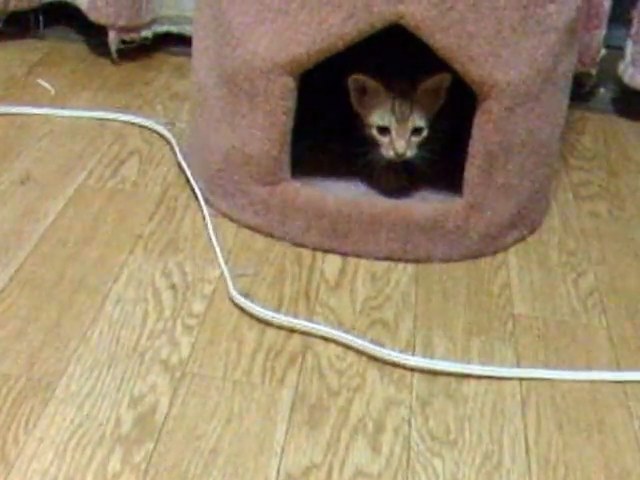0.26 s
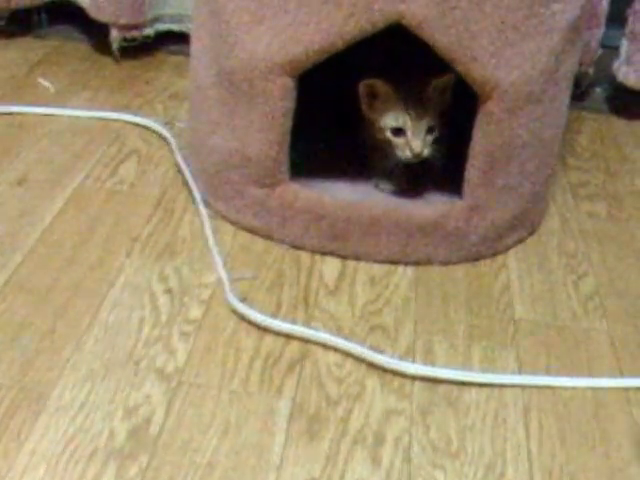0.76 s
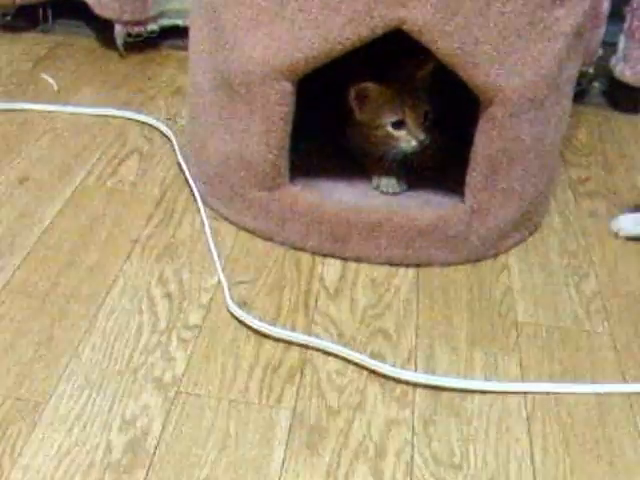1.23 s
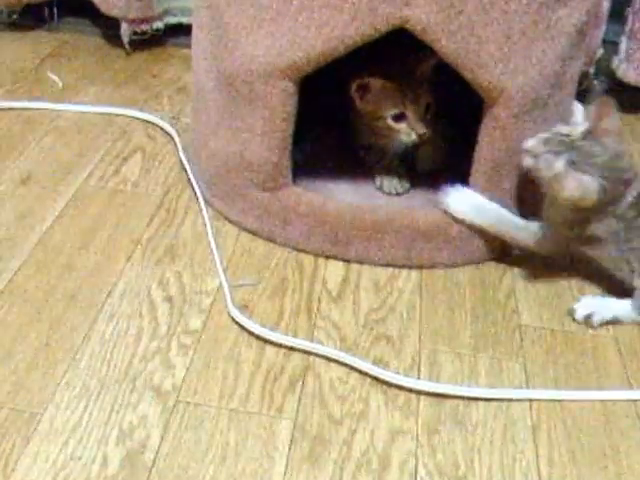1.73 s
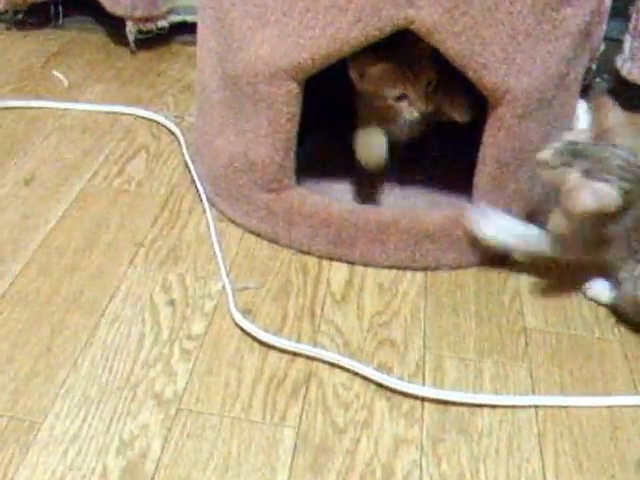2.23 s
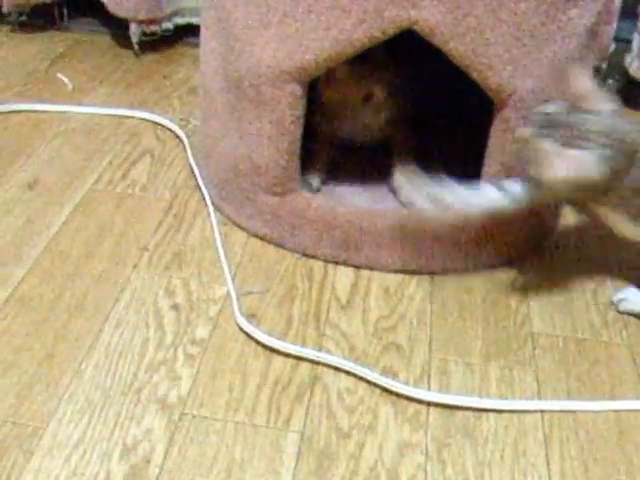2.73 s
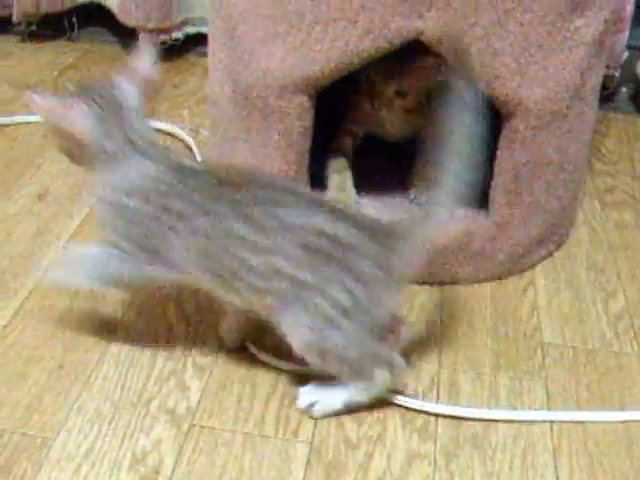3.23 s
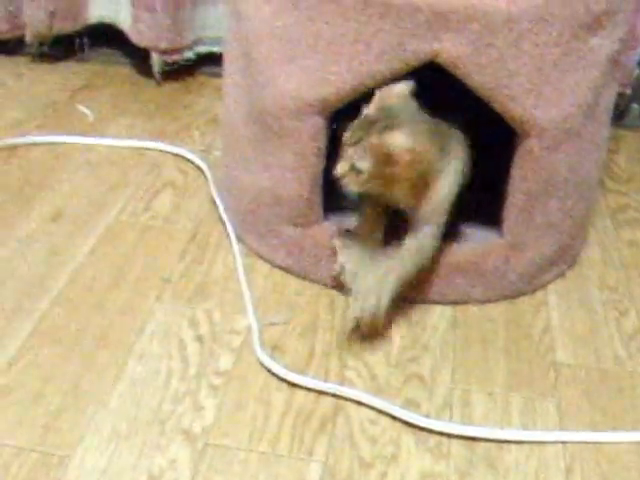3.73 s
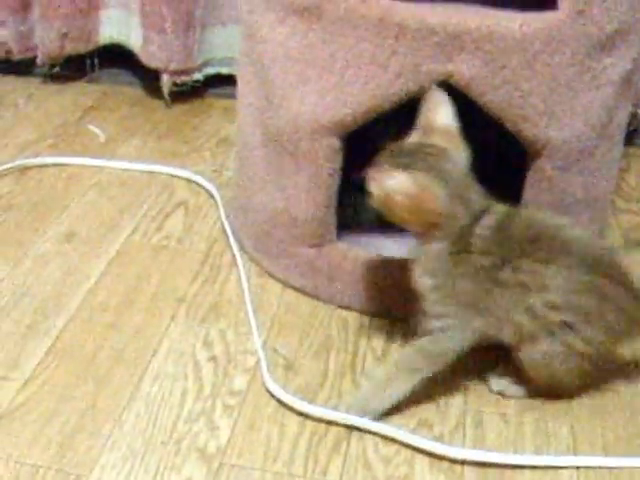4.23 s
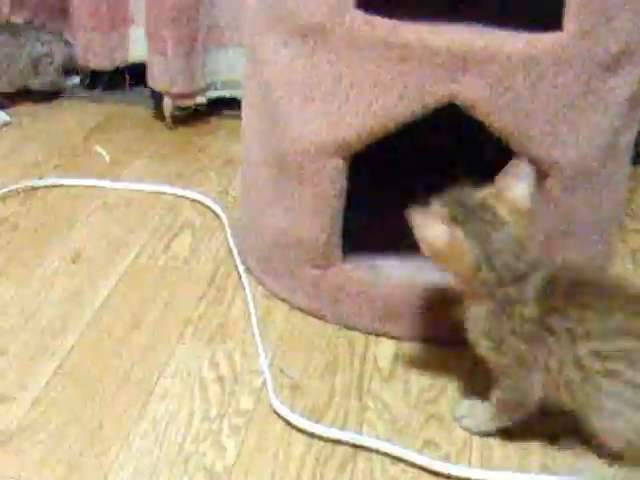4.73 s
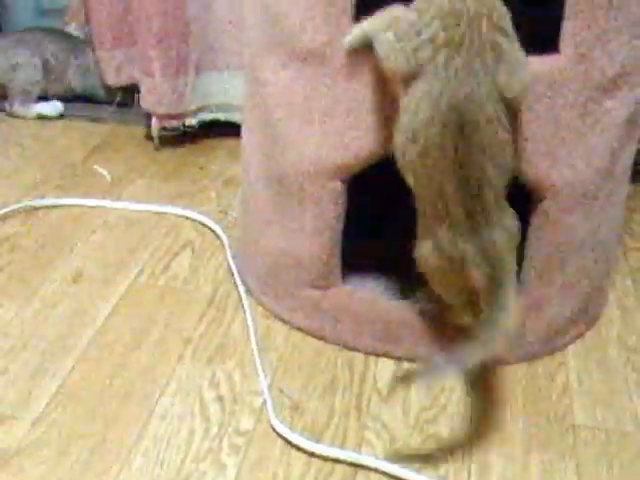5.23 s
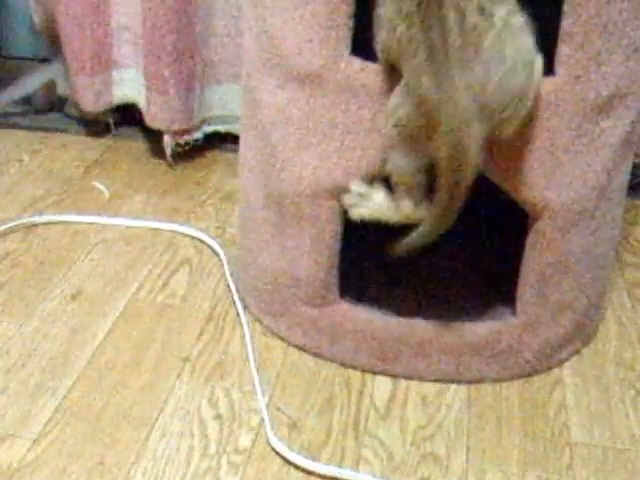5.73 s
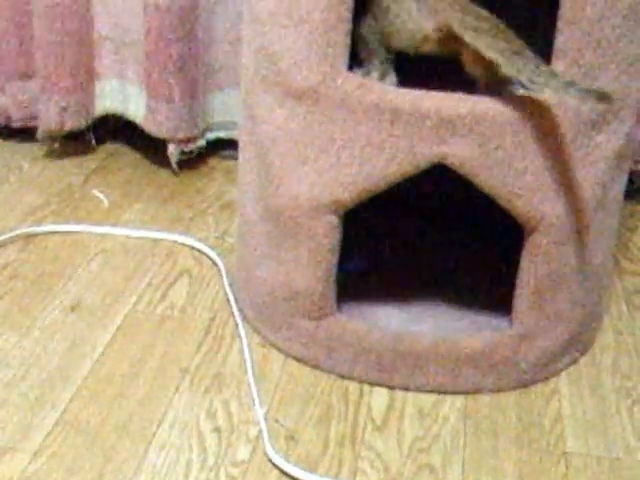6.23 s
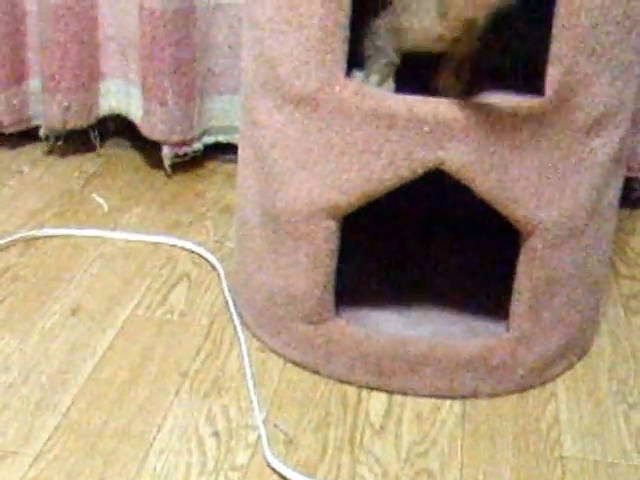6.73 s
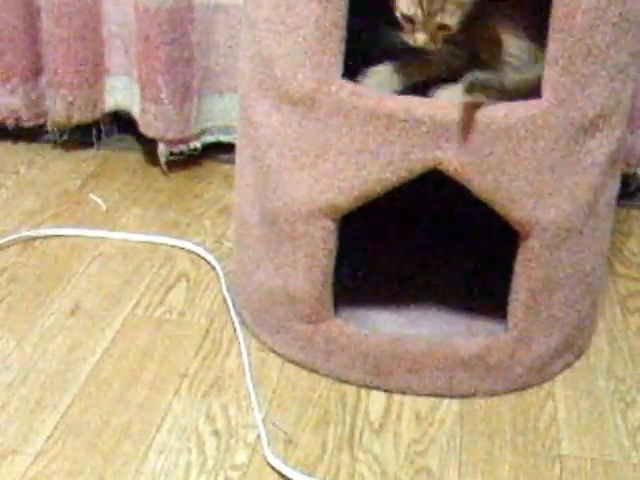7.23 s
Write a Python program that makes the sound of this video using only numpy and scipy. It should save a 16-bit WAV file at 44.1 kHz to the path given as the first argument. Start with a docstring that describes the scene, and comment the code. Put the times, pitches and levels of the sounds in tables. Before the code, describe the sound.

Two kittens romp around a carpeted cat tower on a wooden floor. Claw ticks and quick paw knocks come first, then scattered pats and scuffs, a burst of running steps near three seconds, and scratchy climbing. The last two seconds hold little but a sputtering hiss. Close, small, coarse camera microphone in a small room.

```python
"""Kittens on a cat tower

Two kittens romp round a carpeted cat tower on a wooden floor, close to a small camera.
Pads excite decaying board modes; paws slap as filtered noise bursts; claws tick as short damped tones
and scrape through carpet as grainy noise. Fur brushes past, and a small room answers each contact.
The camera's coarse 8-bit converter turns the faint room noise into a sputtering hiss."""
import sys
import numpy as np
from scipy import signal
from scipy.fft import rfft, irfft, next_fast_len
from scipy.io import wavfile

SR = 44100
rng = np.random.default_rng(int(sys.argv[2]) if len(sys.argv) > 2 else 0)


def put_to_file(sound):
    """Save the sound as 16-bit audio at rate SR, in the file named by the first command-line argument."""
    columns = np.atleast_2d(sound).T  # one column per channel
    safe = np.clip(columns, -1, 1)
    whole_steps = np.round(safe * 32767)
    wavfile.write(sys.argv[1], SR, whole_steps.astype(np.int16))


N = 329292
T = np.arange(SR // 2) / SR  # seconds since a contact

# Paws landing on wood. Each row: start in seconds, snap level in dB before the gain of the taps,
# knock near 500 Hz and clack near 1700 Hz in dB relative to the snap,
# pad thump level in dB, thump pitch in Hz, level of the body's weight in dB.
PAW_LANDINGS = [(.759, -32.5, 3.5, 2, -16.5, 220.2, -35.5), (.849, -34.5, 3.5, -4.5, -19, 148.2, -27),
                (.993, -28.5, -1, -7, -24, 237.5, -33), (1.0269, -23, 3.5, 3.5, -31.5, 238, -27),
                (1.177, -35, 9.5, -2, -35, 98.2, -31.5), (1.405, -40.5, 2, -12.5, -32, 129.7, -47.5),
                (1.496, -38, 11, -1, -32.5, 217.4, -43.5), (1.656, -42.5, 7, -9, -23.5, 234.5, -34),
                (2.2582, -34, 1, 4.5, -27, 353, -47), (2.38, -45, 2.5, 1.5, -30.5, 63.7, -42),
                (2.971, -38, 10, 1.5, -31, 148.2, -44), (3.112, -28, 9, 4, -28.5, 298, -44.5),
                (3.139, -38, 12.5, -5.5, -29.5, 168.3, -28.5), (3.2071, -30.5, 9.5, -3, -25.5, 169, -16.5),
                (3.648, -42, 10, -2, -30, 79, -38.5), (3.868, -38.5, 9, -4, -27, 142.2, -36),
                (3.9369, -35.5, 3, -2.5, -28.5, 84.4, -34.5), (4.054, -41.5, 2, -5.5, -33.5, 67.1, -46),
                (4.186, -37, 6, -2.5, -31.5, 260.4, -37), (4.322, -38.5, 7.5, -3.5, -30.5, 111.3, -43),
                (4.5447, -36, -9.5, -13, -40, 127.6, -50.5), (4.815, -37, -10, 3.5, -46.5, 129.5, -51.5),
                (4.874, -37, -15, -7, -32.5, 109.7, -40.5), (5.227, -47.5, 9, 5.5, -49.5, 198, -49)]
# Claws skidding or dragged through carpet. Each row: start in seconds, level in dB before the gain
# of the scuffs, rise in seconds, t60 in seconds, body near 800 Hz in dB relative to the rasp.
CLAW_SCUFFS = [(0.432, -43, .005, .055, -3.5), (.926, -33.5, 0.011, .16, -9.5),
               (1.595, -28, .008, .08, -10), (1.862, -40.5, 0.0083, .25, -16.5),
               (2.349, -46, 0.0048, .15, 10), (2.77, -42, .014, .2, -2), (2.825, -39.5, 0.0022, .15, 5.5),
               (2.866, -41, .012, .13, -3), (3.334, -33.5, .05, 0.079, -1.5),
               (3.396, -36.5, .018, .22, -21.5), (3.514, -36, 0.0054, .1, -10),
               (3.624, -40, 0.0055, .26, -4), (3.952, -21.5, 0.0014, .07, -10),
               (4.428, -41, 0.021, .21, -7.5), (4.548, -35.5, .007, .11, -4), (4.81, -39.5, .004, .22, -12)]
# Treble response of claw and paw contacts. Each row: frequency in Hz, gain in dB.
CLAW_TREBLE = [(3000, -1), (4700, 0), (6500, -4), (8000, -9), (10000, -23.5)]

SETTLE_S = .014  # the body's weight follows the paw by this delay


def amp(db):
    """Level: decibels to an amplitude ratio."""
    return 10 ** (np.asarray(db) / 20)


def unit(x):
    """Power normalization: x at rms 1."""
    return x / np.sqrt(np.mean(x ** 2))


def unit_energy(x):
    """Energy normalization: squared samples sum to 1."""
    return x / np.linalg.norm(x)


def fade(t60):
    """Exponential damping: a decay of 60 dB in t60 seconds."""
    return np.exp(-np.log(1000) * T / t60)


def onset(time_s):
    """Exponential approach: a rise from 0 towards 1 with this time constant."""
    return 1 - np.exp(-T / time_s)


def along(points, hz):
    """Logarithmic frequency axis: values interpolated between (Hz, value) points."""
    f, v = np.transpose(points)
    return np.interp(np.log(hz + 1), np.log(f), v)


def colour(x, points):
    """Minimum-phase filtering: the (Hz, dB) gain is made causal by folding its cepstrum."""
    m = 2 * next_fast_len(len(x))
    gain_db = along(points, np.fft.rfftfreq(m, 1 / SR))
    cepstrum = irfft(np.log(amp(gain_db)), m)
    cepstrum[1:m // 2] *= 2
    cepstrum[m // 2 + 1:] = 0
    response = np.exp(rfft(cepstrum))
    return irfft(rfft(x, m) * response, m)[:len(x)]


def crackle(spread_db, grain_s=.0003):
    """Granular noise: short grains whose levels scatter by spread_db."""
    grain = (T / grain_s).astype(int)
    sizes = amp(spread_db * np.clip(rng.standard_normal(len(T)), -2, 2))
    return unit(rng.standard_normal(len(T)) * sizes[grain])


def in_room(x, walls_db, tail_db, count=7):
    """Room response: direct sound, early reflections and a diffuse tail, drawn anew for each contact."""
    # Reverberation of the room. Each row: frequency in Hz, t60 in seconds.
    reverb_times = [(100, 0.6), (500, 0.22), (2000, 0.19), (8000, .22)]
    hz, t, z = signal.stft(rng.standard_normal(len(T)), SR, nperseg=256)
    decay = np.exp(-np.log(1000) * t / along(reverb_times, hz)[:, None])
    tail = signal.istft(z * decay, SR, nperseg=256)[1][:len(T)]
    delays = (rng.uniform(.002, .016, count) * SR).astype(int)
    walls = np.bincount(delays, rng.standard_normal(count), len(T))
    answer = amp(walls_db) * unit_energy(walls)
    answer += amp(tail_db) * unit_energy(tail * onset(.013))
    return x + signal.fftconvolve(x, answer)[:len(T)]


def add(track, s, sound):
    """Superposition: mix a sound into the track at s seconds."""
    part = track[round(s * SR):][:len(sound)]
    part += sound[:len(part)]


def background(level_db=-52):
    """Stationary noise: room rumble and microphone noise, its rms below one converter step."""
    # Spectrum of the noise. Each row: frequency in Hz, relative density in dB per Hz.
    spectrum = [(5, -13), (25, -6.5), (45, -2), (75, -3), (120, -11.5), (170, -10), (300, -16.5),
                (900, -19), (2500, -22), (7500, -25)]
    return amp(level_db) * unit(colour(rng.standard_normal(N), spectrum))


def rubs():
    """Friction noise through a resonance: fur brushes the hollow tower in faint swells."""
    # Each row: middle in seconds, level in dB, length in seconds, pitch in Hz.
    fur_strokes = [(0.445, -53.5, 0.056, 1250), (2.808, -55, .04, 474), (5.788, -61, 0.056, 947)]
    out = np.zeros(N)
    time = np.arange(N) / SR
    for s, db, length, hz in fur_strokes:
        resonance = [(hz / 2, -22), (hz, 0), (hz * 2, -16), (hz * 8, -32)]
        hollow = unit(colour(rng.standard_normal(N), resonance))
        swell = np.exp(-((time - s) / length) ** 2)
        out += amp(db) * hollow * swell
    return out


def shuffle_strokes(count=8, gap_s=.045, scatter_db=3, rise_s=.008, t60_s=.14):
    """Irregular repetition: faint scuffs while a kitten shifts its feet; rows like CLAW_SCUFFS."""
    # Each row: start in seconds, end in seconds, level in dB before the gain of the scuffs,
    # body in dB relative to the rasp.
    foot_shifts = [(1.829, 2.05, -46, -12), (2.668, 2.76, -47, -1), (3.969, 4.04, -42, 5.5),
                   (4.618, 4.693, -47, -12), (4.857, 4.91, -44.5, -14.5), (5.033, 5.3, -47.5, -1.5)]
    rows = []
    for start, end, db, body_db in foot_shifts:
        times = start + gap_s * (np.arange(count) + rng.random(count) / 2)
        levels = db + scatter_db * rng.standard_normal(count)
        rows += [(s, level, rise_s, t60_s, body_db) for s, level in zip(times, levels) if s < end]
    return rows


def scuffs(clump_db=3.5, clump_s=.0015, gain_db=7):
    """Stick-slip friction: claws catch and slip in uneven tiny scrapes that swell and die."""
    out = np.zeros(N)
    for s, db, rise, t60, body_db in CLAW_SCUFFS + shuffle_strokes():
        swell = np.minimum(T / rise, 1) ** 1.3
        decay = np.exp(-np.log(1000) * np.maximum(T - rise, 0) / t60)
        body = [(150, body_db - 5.5), (750, body_db), (1700, body_db / 2 - 5.5)]
        rasp = colour(crackle(clump_db, clump_s) * swell * decay, body + CLAW_TREBLE)
        add(out, s, in_room(amp(db + gain_db) * rasp, walls_db=-15, tail_db=-9.0))
    return out


def snags(count=3, level_db=.5, scatter_db=3, median_hz=4376, log_spread=.15, reach=.25):
    """Random catching: claw tips snag just after a scuff's crest; rows of (s, peak dB, pitch Hz)."""
    rows = []
    for s, db, rise, t60, _ in CLAW_SCUFFS:
        for _ in range(count):
            moment = s + rise + reach * t60 * rng.random() ** 2  # reach is a share of t60
            peak_db = db + level_db + scatter_db * rng.standard_normal()
            hz = median_hz * np.exp(log_spread * rng.standard_normal())
            rows.append((moment, peak_db, hz))
    return rows


def ticks(t60=.007, roughness=.7):
    """Damped resonance: a claw tip snaps free and rings for a few milliseconds."""
    # Loud single claw tips. Each row: start in seconds, direct peak in dB, pitch in Hz.
    claw_tips = [(.638, -32, 4210), (.643, -23.5, 4276), (.7405, -21.5, 4260), (.850, -19.5, 5130),
                 (1.573, -29, 6130), (1.661, -30.5, 5130), (1.693, -32, 4400), (2.137, -31.5, 3650),
                 (2.2587, -23.5, 5670), (3.041, -35, 4680), (3.207, -16, 5330), (3.514, -25, 3940),
                 (3.625, -30.5, 4020), (4.361, -27, 4530), (4.545, -24.5, 3870), (4.809, -26.5, 4250),
                 (4.8742, -25.5, 4050), (5.055, -30.5, 4660), (5.2338, -24, 3620), (5.295, -26, 4640),
                 (5.313, -29, 4820)]
    out = np.zeros(N)
    for s, db, hz in claw_tips + snags():
        snap = unit(colour(crackle(spread_db=-6), [(500, -13.5), (1800, -30)] + CLAW_TREBLE))
        tip = (np.sin(2 * np.pi * hz * T) + roughness * snap) * fade(t60) * onset(.00036)
        tip /= np.abs(tip).max()
        add(out, s, in_room(amp(db) * tip, walls_db=-13, tail_db=-8))
    return out


def paw_contacts():
    """Successive impacts: a paw rolls down toes, ball, heel; rows of (s, snap, knock, clack, t60)."""
    chatter_s, shrink = .026, 1.2  # toes' t60 at 0 dB clack; dB shorter per dB of clack
    dull_clack_db = -4  # duller steps than this all chatter alike
    # the ball of the paw follows the toes: weaker but woodier
    roll_s, roll_db, roll_knock_db = .004, -11.5, 7
    roll_grows = .5  # dB more roll per dB of clack: a flat landing slaps twice
    heel_db = -11.5  # relative to the snap
    rows = []
    for s, db, knock_db, clack_db, *_ in PAW_LANDINGS:
        t60 = chatter_s * amp(-shrink * max(clack_db, dull_clack_db))
        ball_db = db + roll_db + roll_grows * clack_db
        rows += [(s, db, knock_db, clack_db, t60),
                 (s + roll_s, ball_db, knock_db + roll_knock_db, clack_db, t60),
                 (s + SETTLE_S, db + heel_db, knock_db, clack_db, chatter_s)]
    return rows


def taps(chatter=1.2, crack_t60=.0066, settle_s=.0018, softening=.36, touch=.25, touch_t60=.032, gain_db=33):
    """Impact filtered by wood: the pad brushes it, slaps a moment later, then toes and claws chatter."""
    out = np.zeros(N)
    lead = SR // 50  # samples of brushing before the slap
    hardest_db = max(row[1] for row in PAW_LANDINGS)
    for s, db, knock_db, clack_db, t60 in paw_contacts():
        # reversed decay: the brush grows up to the slap
        brush = touch * unit_energy(crackle(spread_db=1.5) * fade(touch_t60))[:lead][::-1]
        # the pad cushions a gentle step, so its crack is weaker
        crack = amp(softening * (db - hardest_db)) * unit_energy(crackle(spread_db=2.0) * fade(crack_t60))
        toes = chatter * unit_energy(crackle(spread_db=7.0) * fade(t60) * onset(settle_s))
        force = unit_energy(np.concatenate([brush, crack + toes])[:len(T)])
        knock = [(80, knock_db - 11.5), (320, knock_db - 2.5), (500, knock_db + 2),
                 (700, knock_db - 2), (1000, knock_db - 3)]
        clack = [(1400, clack_db + 0.5), (2100, clack_db - 3.0)]
        tap = amp(db + gain_db) * colour(force, knock + clack + CLAW_TREBLE)
        add(out, s - lead / SR, in_room(tap, walls_db=-11.0, tail_db=-6.0))
    return out


def pad_contacts():
    """Loading of a panel: a pad thumps, then the body's weight; rows of (s, dB, Hz, t60)."""
    # Soft bumps on carpet and tower. Each row: start in seconds, level in dB, pitch in Hz.
    soft_bumps = [(.865, -21.5, 117.6), (1.607, -27, 119.6), (2.209, -31.5, 57.3), (2.568, -30, 53.8),
                  (3.153, -24.5, 159.3), (3.474, -31, 78.7), (3.605, -33.5, 84.2), (4.421, -36.5, 264.6),
                  (4.98, -38.5, 282.3), (5.156, -30, 341.6), (5.157, -29.5, 186.3), (5.291, -40, 226.4)]
    weight_hz, log_spread = 82.43, .2  # median pitch of the weight, and its scatter from spot to spot
    ring_s, ring_hz, ring_slope = .105, 151.3, .15  # t60 at this pitch; lower boards ring longer
    pads = [(s, db, hz) for s, _, _, _, db, hz, _ in PAW_LANDINGS]
    weights = [(s + SETTLE_S, db, weight_hz * np.exp(log_spread * rng.standard_normal()))
               for s, *_, db in PAW_LANDINGS]
    return [(s, db, hz, ring_s * (ring_hz / hz) ** ring_slope) for s, db, hz in pads + weights + soft_bumps]


def thumps(rise_s=.002, panels=.71, log_scatter=.45, shudder=.24, shudder_t60=.14, count=6):
    """Modal ringing: a pad makes its board boom, neighbouring panels ring and the frame shudders."""
    # Resonances of floor and tower panels. Each row: frequency in Hz, gain in dB.
    board_response = [(35, -12), (73, 1), (105, -3.5), (145, 1), (180, -2), (223, 6.5), (300, -8.5),
                      (400, -7), (515, -8.5), (650, -18), (1200, -37.5), (3000, -62.5)]
    out = np.zeros(N)
    for s, db, hz, t60 in pad_contacts():
        pitches = hz * np.exp(log_scatter * rng.standard_normal((count, 1)))
        phases = rng.random((count, 1))
        neighbours = np.sin(2 * np.pi * (pitches * T + phases)).sum(0) / np.sqrt(count)
        board = np.sin(2 * np.pi * hz * T)
        boom = (board + panels * neighbours) / np.hypot(1, panels) * fade(t60)
        frame = shudder * unit(colour(rng.standard_normal(len(T)), board_response)) * fade(shudder_t60)
        thump = amp(db) * (boom + frame) * onset(rise_s)
        add(out, s, in_room(thump, walls_db=-26, tail_db=-13.5))
    return out


def scene():
    """Superposition: all the kittens' sounds over the background, in one channel."""
    return (background() + rubs() + scuffs() + ticks() + taps() + thumps())[None]


def record(dry, bias=.09, converter_hz=16000, step=1 / 128, top_hz=10250):
    """Quantization: silence rests bias steps above a threshold, so faint noise flips steps and sputters."""
    # Output filter of the camera. Each row: frequency in Hz, gain in dB.
    smoothing = [(5500, 0), (7000, -1.5), (8000, -7), (8800, -14), (9500, -25.5), (10200, -42)]
    m = round(N * converter_hz / SR)
    sampled = signal.resample(dry, m, axis=-1)
    stepped = step * np.floor(sampled / step + bias)
    hz = np.fft.rfftfreq(N, 1 / SR)
    # the spectrum repeats above the converter's range; the gentle filter passes a little mirrored treble
    mirrored = np.fft.fft(stepped)[:, np.arange(len(hz)) % m] * N / m
    return irfft(mirrored * amp(along(smoothing, hz)) * (hz < top_hz), N)


dry = scene()
out = record(dry)
put_to_file(out)
```